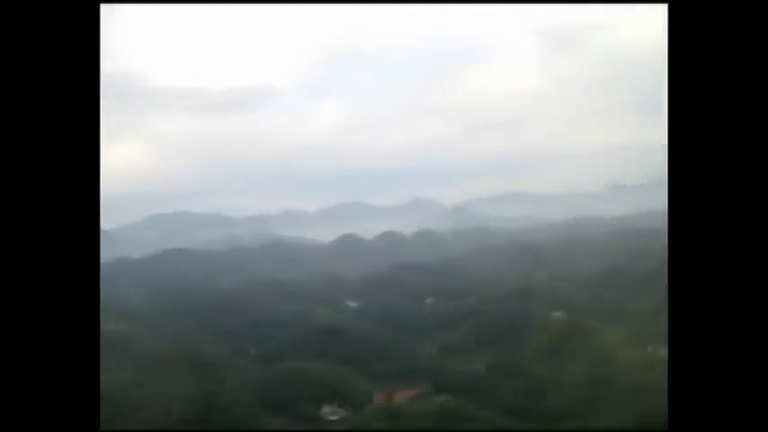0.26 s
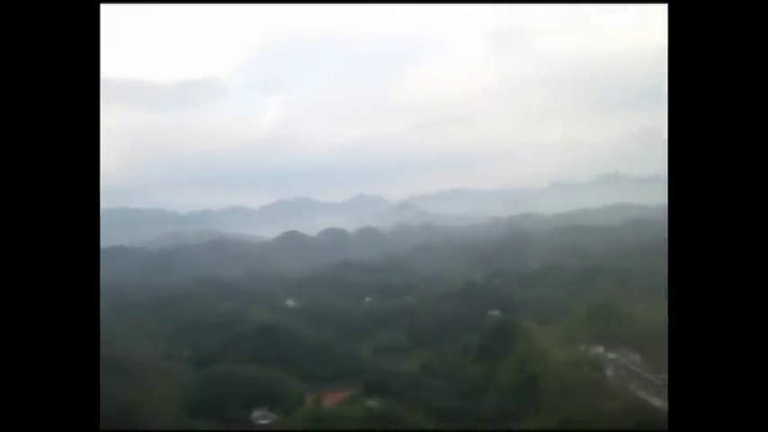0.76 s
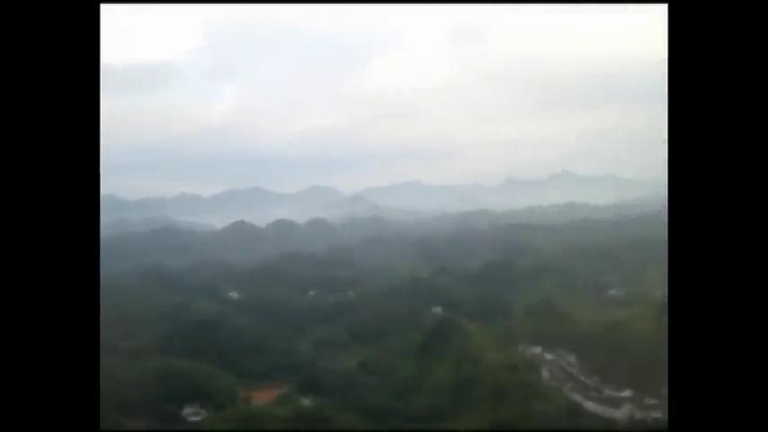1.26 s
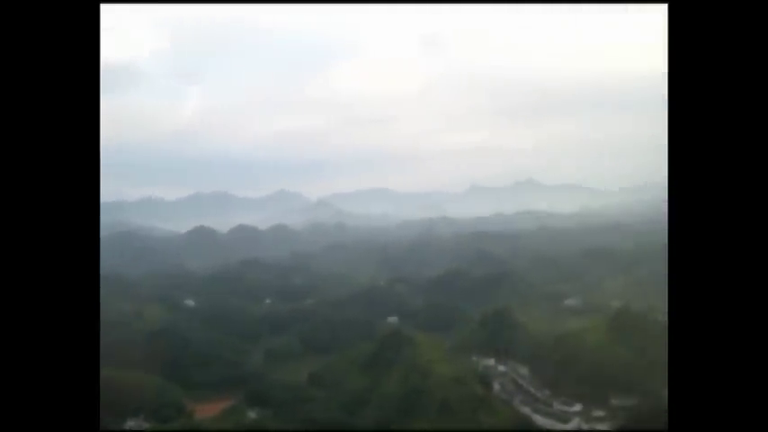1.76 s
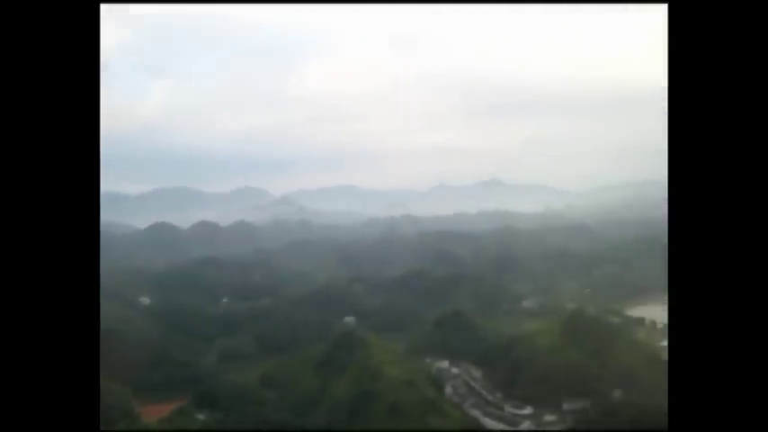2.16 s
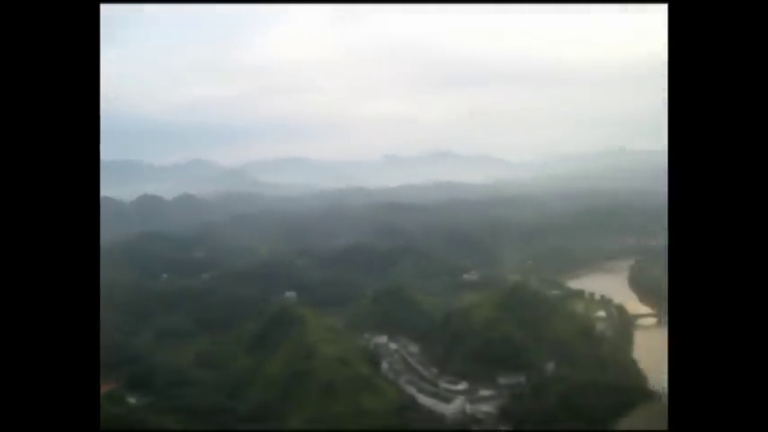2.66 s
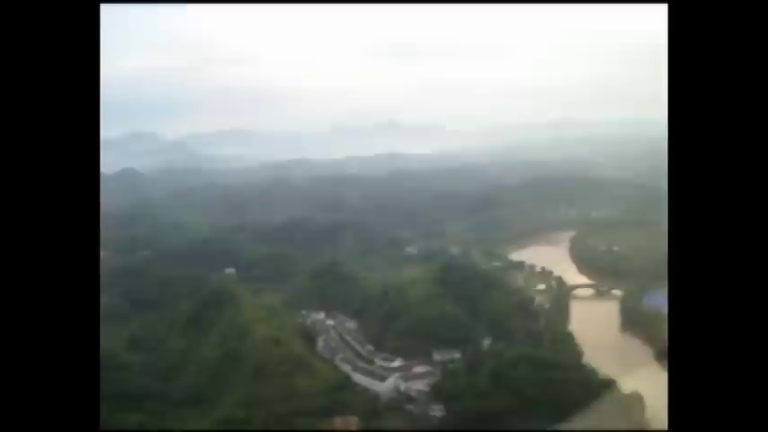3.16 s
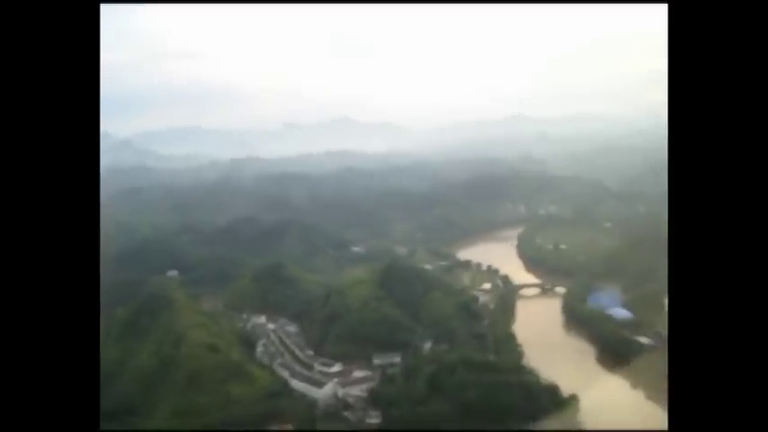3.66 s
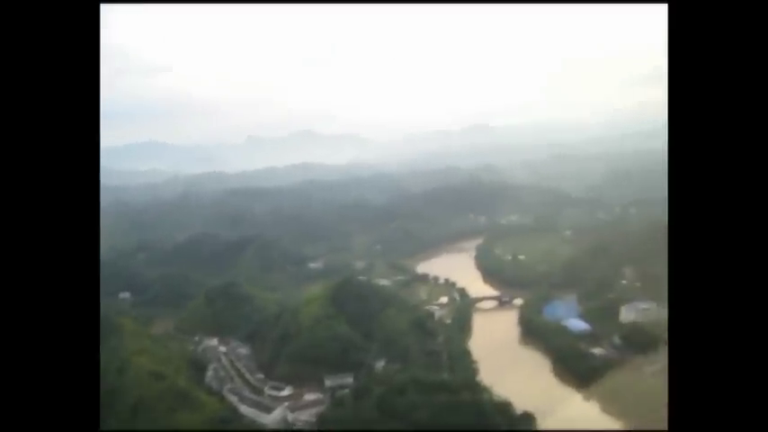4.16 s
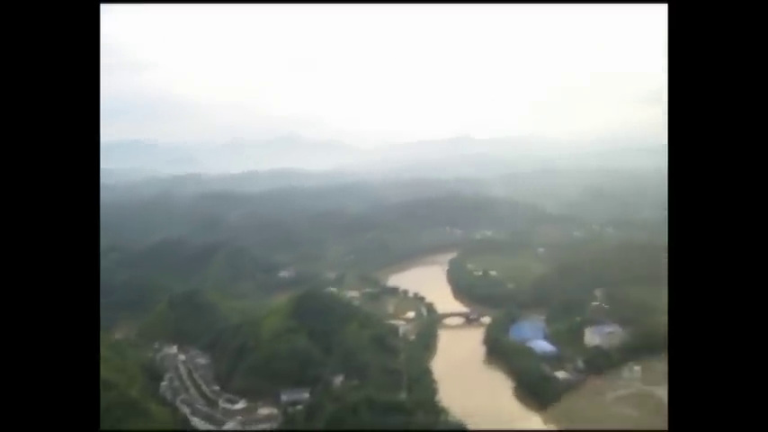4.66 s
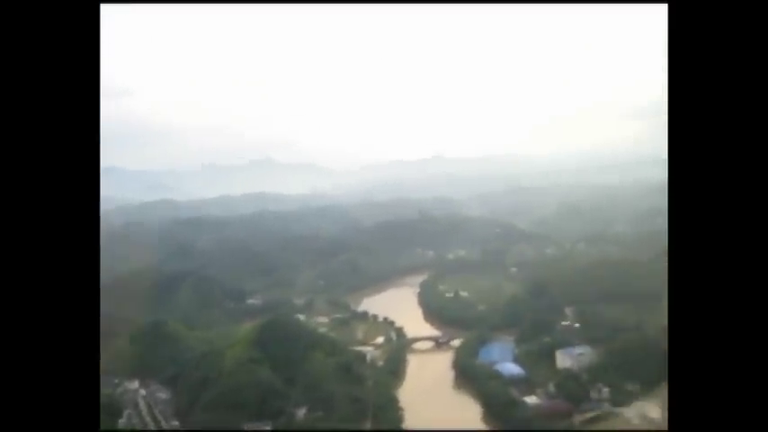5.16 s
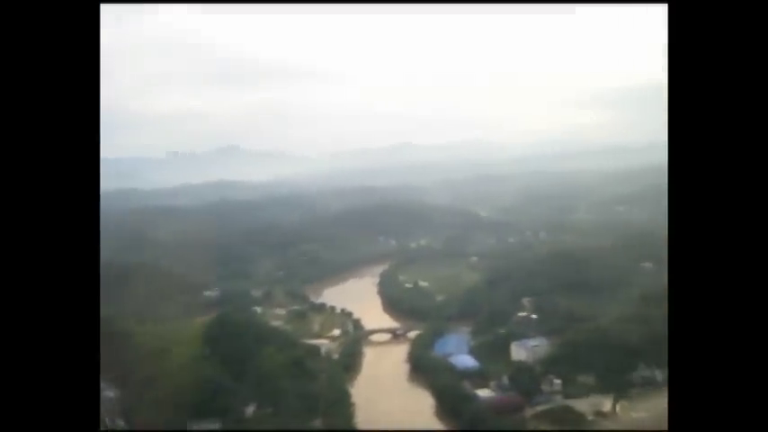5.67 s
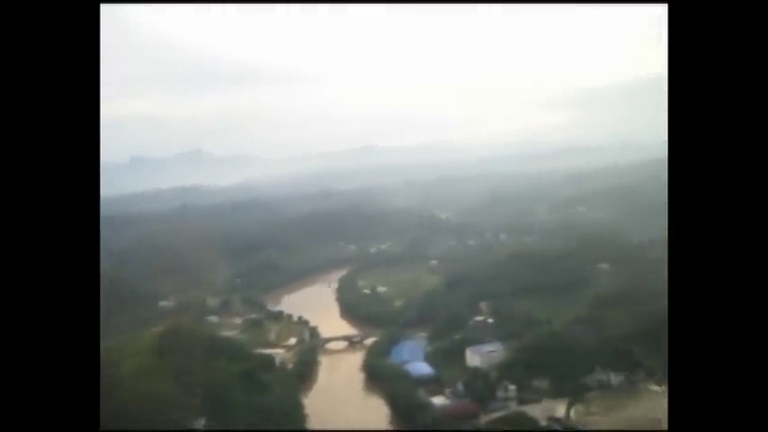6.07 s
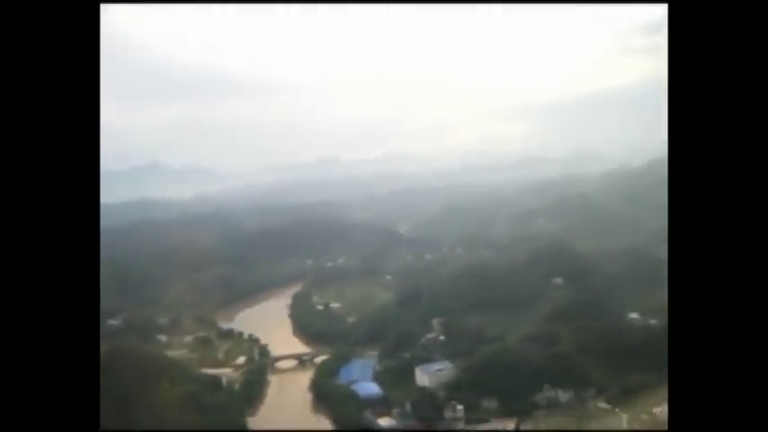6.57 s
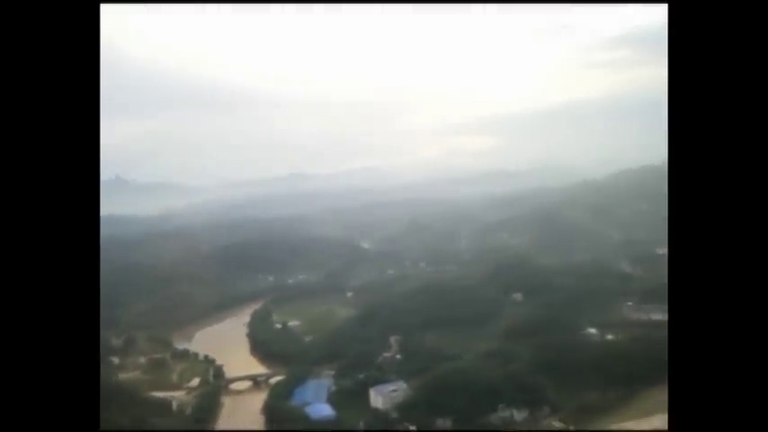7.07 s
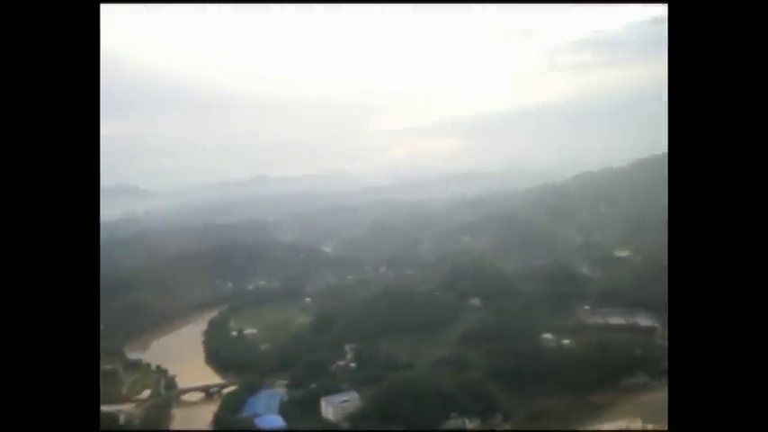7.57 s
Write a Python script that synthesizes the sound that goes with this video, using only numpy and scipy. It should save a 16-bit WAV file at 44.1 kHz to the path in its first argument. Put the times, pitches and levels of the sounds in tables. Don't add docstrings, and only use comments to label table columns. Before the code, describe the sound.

From 0 to about 7.8 seconds, the full, continuous noise of a helicopter cabin in level flight, already running at the start and cut off without winding down. A piercing gear whine near 1055 Hz leads, with a strong octave and a crowd of weaker metallic tones from about 500 Hz to 5 kHz, pulsing nearly six times a second. All glide together by tiny amounts, sagging slightly around 3 and 5.4 seconds and recovering near 6.5. Low downwash rumble and broad wind roar through ringing panels fill the space beneath. Near 10.7 kHz a thin turbine whistle flutters in hiss, with brief drop-outs, its air noise a little weaker around 4 to 5 seconds. The hand-held microphone shifts, so individual tones swell and fade, most noticeably around 5.5 seconds. Nearly mono, close and enclosed, with faint side bursts.

```python
import sys
import numpy as np
from scipy import signal
from scipy.fft import rfft, irfft, next_fast_len
from scipy.io import wavfile
from scipy.ndimage import uniform_filter1d, map_coordinates

SR = 44100
rng = np.random.default_rng(int(sys.argv[2]) if len(sys.argv) > 2 else 0)


def file_out(sig):
    cols = np.atleast_2d(sig).T
    lim = np.clip(cols, -1, 1)
    pcm = np.round(lim * 32767).astype(np.int16)
    wavfile.write(sys.argv[1], SR, pcm)


def invert_db(level):
    return 10 ** (np.asarray(level, dtype=float) / 20)


N = 344862

STEP = 64
STEPS = np.arange(0, N, STEP) / SR
TURN_HZ = 5.7737


def curves(rows):
    seconds, *columns = np.transpose(rows)
    return np.array([np.interp(STEPS, seconds, column) for column in columns])


def wobble(rate):
    knots = rng.standard_normal(int(N * rate / SR) + 4)
    return map_coordinates(knots, [STEPS * rate])


def full(control):
    return uniform_filter1d(control.repeat(STEP)[:N], size=STEP)


def gate(bias, eddies):
    opening = np.clip(np.tanh(bias + eddies), 0, 1)
    return uniform_filter1d(full(opening), size=64)


def tone(turns, db):
    angle = (2 * np.pi * (turns - np.floor(turns))).astype(np.float32)
    peak = (np.sqrt(2) * invert_db(db)).astype(np.float32)
    return full(peak) * np.cos(angle)


def along(points):
    f, db = np.transpose(points)
    return lambda hz: invert_db(np.interp(np.log(hz + 1), np.log(f + 1), db))


def humps(modes):
    def gain(hz):
        return np.sqrt(sum(invert_db(2 * db) / (1 + (2 * (hz - centre) / w) ** 2) ** 2 for centre, w, db in modes))
    return gain


def noise(gain):
    m = next_fast_len(N)
    white = rfft(rng.standard_normal(m)) * np.sqrt(SR / 2)
    return irfft(white * gain(np.fft.rfftfreq(m, 1 / SR)), m)[:N]


def gearbox():
    # time in seconds, tooth rate of the bevel gear in Hz
    speed = [(0, 1055.2), (.3, 1054.8), (.9, 1056.2), (1.3, 1056.6), (1.8, 1056.0), (2.6, 1054.4),
             (3.2, 1054.2), (3.9, 1055.5), (4.4, 1055.5), (5.0, 1053.8), (5.4, 1053.0), (5.65, 1053.3),
             (6.0, 1055.3), (6.4, 1056.3), (6.9, 1056.3), (7.82, 1054.4)]
    # Hz at
    # nominal speed, dB rms, slope of its standing wave in gain per cm sideways, forward and up
    leading_tones = [(1055, -20.4, -0.066, 0.012, -0.025), (2110, -28.7, 0.085, -0.011, 0.036),
                     (3165, -50.8, 0.264, -0.235, 0.069), (4220, -42.1, -0.196, 0.048, 0.05),
                     (5275, -53.0, 0.139, 0.019, -0.063), (759.24, -37.9, 0.096, -0.079, 0.024),
                     (1518.47, -37.4, 0.044, -0.022, 0.056), (1524.24, -33.3, 0.214, 0.093, -0.03),
                     (2271.9, -33.4, 0.155, -0.074, -0.018), (586.12, -35.0, -0.039, 0.073, 0.05),
                     (1612.0, -37.5, -0.01, 0.047, 0.072), (2664.25, -34.7, -0.013, -0.112, 0.049),
                     (3796.2, -43.7, -0.049, 0.001, -0.028), (683.93, -35.5, -0.037, 0.001, -0.062),
                     (1184.1, -38.7, -0.02, 0.036, 0.075), (1286.6, -43.7, -0.077, 0.116, -0.005),
                     (1826.85, -42.0, 0.091, 0.151, 0.018), (23.0, -40.0, 0.132, -0.063, 0.006),
                     (643.3, -38.7, -0.005, -0.043, 0.005), (2740.45, -44.1, 0.027, 0.135, -0.007),
                     (3653.8, -50.1, -0.001, -0.005, -0.068), (4543.9, -48.1, -0.154, -0.155, -0.052),
                     (4572.7, -53.1, -0.108, 0.269, 0.097), (5328.6, -51.6, -0.182, -0.044, -0.047)]
    # time in seconds, cm sideways, cm forward, cm up
    drift = [(0.0, 0.6, 3.9, -0.4), (0.76, 1.0, 3.5, 0.5), (1.12, -0.3, 3.0, 1.6), (1.38, 0.2, 2.2, 0.7),
             (1.94, -0.9, 1.8, 1.1), (2.4, -2.9, 0.9, 2.1), (2.76, -2.7, -0.9, 0.5),
             (3.12, -2.0, -0.5, -3.2), (3.78, -1.5, -0.6, -0.1), (4.04, -1.8, -0.8, 1.2),
             (4.7, -2.9, -3.1, -0.4), (4.96, -1.6, -2.1, -1.4), (5.52, 3.4, 1.4, -6.9),
             (5.88, 1.1, -2.1, -1.1), (6.24, 2.6, -0.8, 0.4), (6.7, 2.9, -1.7, 2.6), (7.16, 3.0, -2.3, 2.2),
             (7.82, 1.3, -1.6, 1.2)]

    shaft = .025 + np.cumsum(full(curves(speed)[0])) / 1055 / SR
    leaders, centre_db, *slopes = np.transpose(leading_tones)
    standing = abs(1 + np.transpose(slopes) @ curves(drift))
    standing = np.maximum(standing, .1)
    levels = centre_db[:, None] + 20 * np.log10(standing)

    out = np.zeros(N)
    for hz, db in zip(leaders, levels):
        out += tone(hz * shaft, db + .2 * wobble(9) + .3 * wobble(1.6))

    swells = .45 * np.clip(levels - np.median(levels, axis=1)[:, None], -4, 8)
    swells -= 10 * np.log10(np.mean(invert_db(2 * swells), axis=1))[:, None]
    out += planet_gears(shaft, leaders, swells)
    return out + shafts_and_accessories(shaft, leaders, swells)


def planet_gears(shaft, leaders, swells):
    # Hz of the leader, distance from it in rotor turns, dB rms
    side_tones = [(759.5, -2, -45.9), (759.5, -1, -45.1), (759.5, 1, -46.4), (759.5, 3, -53.1),
                  (1524.3, -5, -51.8), (1524.3, -4, -51.5), (1524.3, -3, -45.4), (1524.3, -2, -50.1),
                  (1524.3, 1, -49.8), (1524.3, 2, -49.5), (1524.3, 3, -48.4), (1524.3, 4, -51.7),
                  (1524.3, 5, -51.5), (2272.2, 1, -47.1), (2272.2, 4, -47.1), (2272.2, 5, -50.7)]
    # Hz of the overtone, dB rms
    overtones = [(3014.0, -57.2), (3019.7, -49.9), (3025.5, -56.3), (3031.1, -54.7), (3042.6, -54.0),
                 (3048.5, -48.9), (3054.2, -56.1), (3802.0, -57.3), (3825.0, -52.7), (4555.5, -59.5),
                 (4561.2, -50.9), (4567.0, -56.4), (4580.2, -56.2), (5291.6, -61.0), (5320.5, -59.9),
                 (5349.2, -61.5), (6068.1, -56.9), (6079.7, -66.4), (6096.9, -69.0), (6815.8, -73.6),
                 (6821.5, -74.4), (6827.2, -73.4), (6844.6, -71.1), (8340.0, -76.0), (8363.2, -82.3),
                 (8368.8, -78.0), (9094.2, -68.5)]

    out = np.zeros(N)
    for hz, k, db in side_tones:
        near = np.argmin(abs(leaders - hz))
        start = (k + (k < 0)) / 3 * (k > 0 or hz > 1000)
        out += tone((leaders[near] + k * TURN_HZ) * shaft + start, db + swells[near])
    for hz, db in overtones:
        hz = round(2 * hz / TURN_HZ) * TURN_HZ / 2
        turns = hz * (shaft + .086) + .08 * rng.standard_normal()
        near = np.argmin(abs(leaders - hz))
        out += tone(turns, db + swells[near] + 1.5 * wobble(1.23))
    return out


def shafts_and_accessories(shaft, leaders, swells):
    # Hz at nominal speed, dB rms
    weak_tones = [(46.0, -50.3), (98.7, -51.4), (107.7, -46.0), (469.0, -51.7), (656.1, -47.4),
                  (690.7, -48.1), (837.4, -50.2), (843.2, -46.8), (986.8, -49.4), (1029.3, -49.6),
                  (1032.0, -49.4), (1095.3, -43.5), (1217.0, -51.0), (1235.1, -53.5), (1252.8, -52.7),
                  (1309.3, -49.0), (1326.8, -54.1), (1338.1, -47.3), (1367.9, -53.7), (1570.2, -50.4),
                  (1659.5, -50.1), (1831.5, -52.7), (1874.8, -55.3), (1903.0, -44.0), (1929.9, -51.8),
                  (1992.8, -54.7), (2064.0, -55.5), (2142.4, -56.0), (2368.2, -56.4),
                  (2467.0, -47.9), (2579.2, -53.1), (2641.3, -53.3), (2687.3, -52.0), (3008.2, -53.8),
                  (3223.9, -57.7), (3327.0, -61.1), (3351.2, -58.5), (3634.2, -61.3), (3767.5, -54.0),
                  (3937.0, -60.0), (3956.3, -59.2), (4021.9, -60.5), (4098.8, -60.7), (4159.8, -60.2),
                  (4417.9, -55.4), (4688.9, -55.8), (4836.0, -61.1), (4914.8, -55.8), (4936.2, -58.0),
                  (4940.5, -60.5), (5480.8, -59.6), (5709.2, -66.0), (6330.1, -70.9), (6448.0, -72.5),
                  (6786.9, -73.8), (7212.6, -72.0), (9088.3, -70.5), (13965.7, -77.0), (9091.4, -69.5)]
    # Hz at nominal speed, dB rms
    twin_tones = [(644.5, -44), (3652.6, -54)]

    out = np.zeros(N)
    for hz, db in weak_tones + twin_tones:
        swell_db = swells[np.argmin(abs(leaders - hz))]
        out += tone(hz * shaft + rng.random(), db + swell_db + 1.1 * wobble(1.37))
    return out


def compressors():
    # time in seconds, first engine's blade tone in Hz and dB rms, second engine's in Hz and dB rms
    whine = [(0, 10764, -42, 10744, -47), (.8, 10764, -47, 10743, -50), (1.2, 10763, -38, 10743, -50),
             (2, 10747, -38, 10732, -46), (2.15, 10745, -45, 10729, -52), (2.4, 10744, -39, 10724, -48),
             (3, 10744, -42, 10730, -49), (3.2, 10754, -48, 10734, -52), (3.45, 10769, -42, 10741, -53),
             (4, 10765, -43, 10746, -52), (4.4, 10757, -50, 10742, -51), (4.7, 10758, -43.5, 10741, -44),
             (5, 10764, -43, 10742, -44), (5.9, 10794, -40, 10744, -42), (6.3, 10787, -43, 10740, -45),
             (6.8, 10760, -44, 10737, -43), (7.82, 10764, -45, 10740, -40)]
    # time in seconds, dB about the mean
    flow = [(0, 0), (1, -3), (2, -1), (3, -3), (4, -4.5), (5, -4), (6, -1), (7, -0.5), (7.82, .5)]
    intake_hz = (10760, 10880)
    # width in Hz, dB per Hz
    intake_shape = [(90, -63.5), (800, -69)]
    # Hz, dB per Hz
    hiss_points = [(7000, -125), (7950, -114), (8400, -94.5), (9150, -89), (9500, -87.5), (10300, -89),
                   (11300, -82.5), (12000, -89.5), (13000, -91), (15700, -92)]

    hz_a, db_a, hz_b, db_b = curves(whine)
    passing = gate(4.0, 0.69 * wobble(40) + 2.6 * wobble(120))
    blades = 0
    for hz, db in [(hz_a, db_a), (hz_b, db_b)]:
        jitter = full(.05 * wobble(30) + .04 * wobble(150))
        turns = np.cumsum(full(hz)) / SR + jitter
        blades = blades + tone(turns, db + 1.5 + 0.87 * wobble(28) + 0.5 * wobble(4))

    core, skirt = (noise(humps([(hz, *shape)])) for hz, shape in zip(intake_hz, intake_shape))
    draught = full(invert_db(curves(flow)[0] + 0.62 * wobble(28)))
    duct = draught * ((0.53 + .3 * passing) * core + (0.75 + 0.42 * passing) * skirt)
    hiss = full(invert_db(1.7 * wobble(28))) * noise(along(hiss_points))
    return passing * blades + duct + hiss


def airframe():
    # Hz, dB per Hz
    rumble_points = [(4, -97), (18, -68), (60, -60.5), (120, -62), (190, -56), (260, -58), (400, -61),
                     (520, -64.5), (900, -93), (1500, -120)]
    roar_points = [(200, -120), (400, -71), (560, -66.5), (800, -61.5), (1300, -63.5), (1950, -65),
                   (2900, -70), (3450, -72.5), (4300, -71), (5500, -77.5), (6500, -84), (7550, -94.5),
                   (7850, -116), (8500, -125)]
    # centre in Hz, width in Hz, dB per Hz
    panels = [(646, 132, -57.5), (1016, 190, -58.5), (1614, 290, -61.5), (2133, 80, -62.5),
              (2294, 47, -60.5), (2660, 100, -65), (3024, 61, -64.5), (3844, 40, -69.5), (4740, 96, -75),
              (5350, 47, -66.5)]

    rumble = full(invert_db(-0.8 + 0.24 * wobble(4.1))) * noise(along(rumble_points))
    roar = noise(along(roar_points)) + noise(humps(panels))
    return rumble + full(invert_db(-.3 + .6 * wobble(5.5))) * roar


def side_noise():
    # Hz, dB per Hz
    low_band = [(2000, -125), (2300, -80), (2700, -76.5), (3000, -80), (3300, -100), (3800, -125)]
    high_band = [(5050, -125), (5200, -87), (6000, -86), (6200, -125)]

    low = gate(1.66, 3 * wobble(16)) * noise(along(low_band))
    high = gate(-0.26, 4 * wobble(14)) * noise(along(high_band))
    return np.outer([1, -1], low + high)


def scene():
    cabin = compressors() + airframe() - gearbox()
    return cabin + side_noise()


def roll_off(x):
    return signal.sosfilt(signal.butter(12, 15735, fs=SR, output="sos"), x)


def record(dry):
    return roll_off(dry)


dry = scene()
out = record(dry)
file_out(out)
```